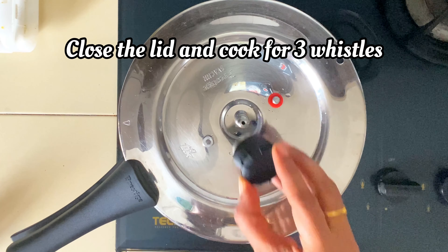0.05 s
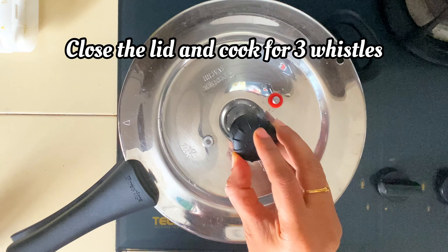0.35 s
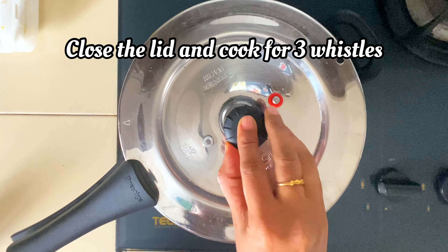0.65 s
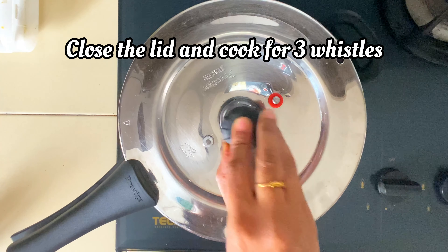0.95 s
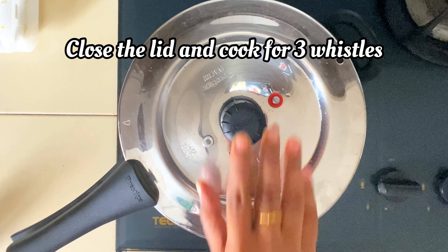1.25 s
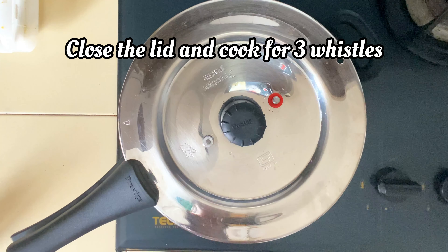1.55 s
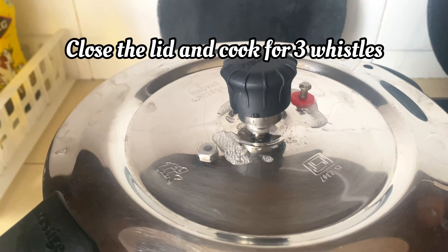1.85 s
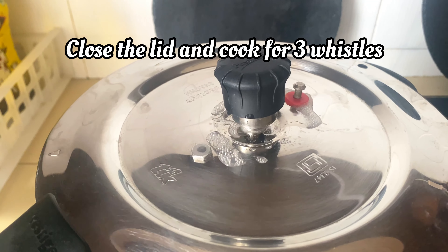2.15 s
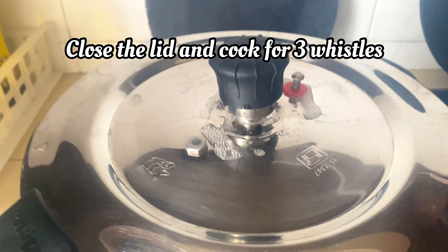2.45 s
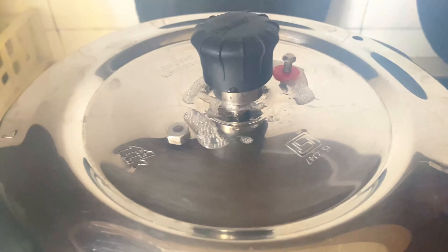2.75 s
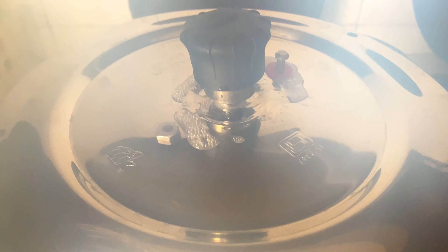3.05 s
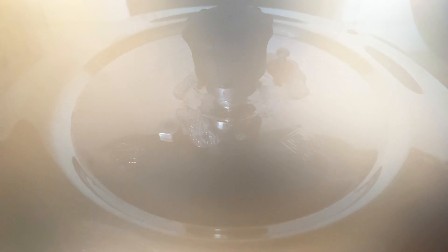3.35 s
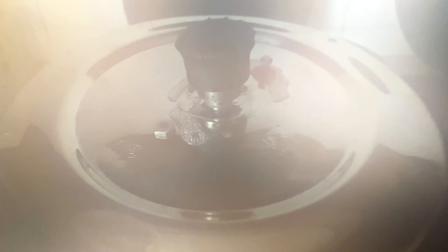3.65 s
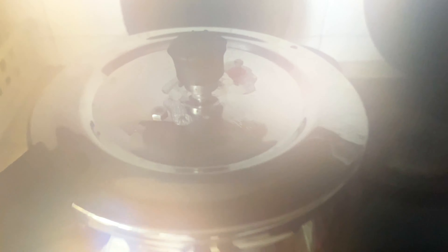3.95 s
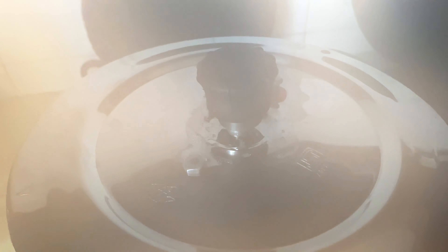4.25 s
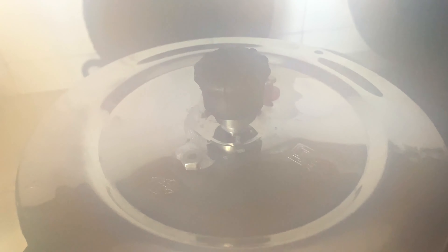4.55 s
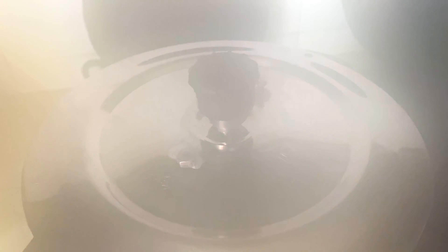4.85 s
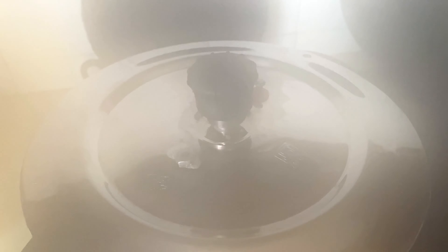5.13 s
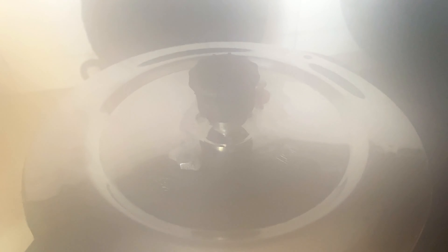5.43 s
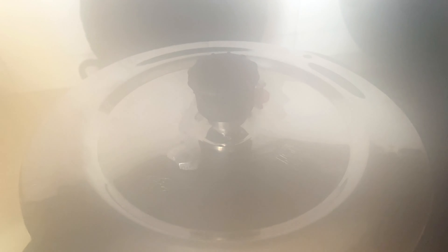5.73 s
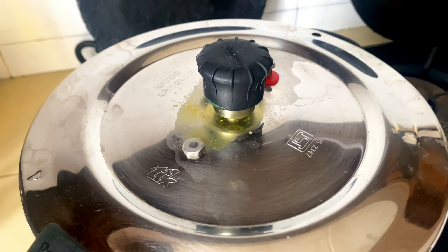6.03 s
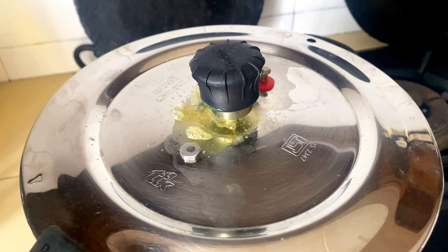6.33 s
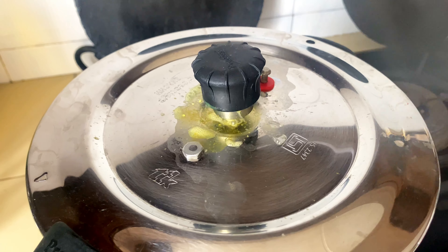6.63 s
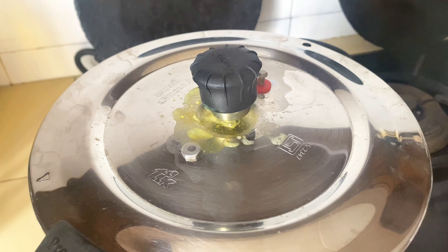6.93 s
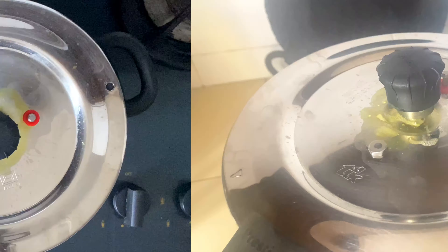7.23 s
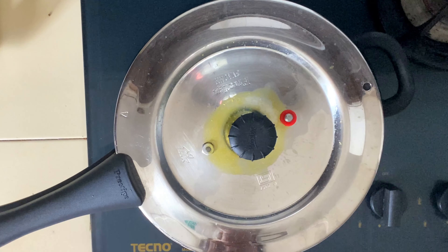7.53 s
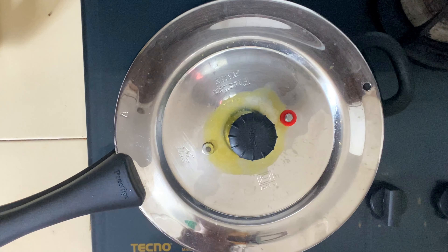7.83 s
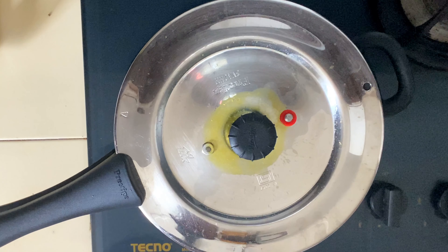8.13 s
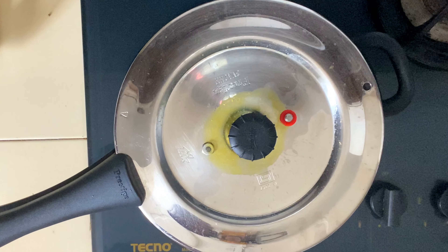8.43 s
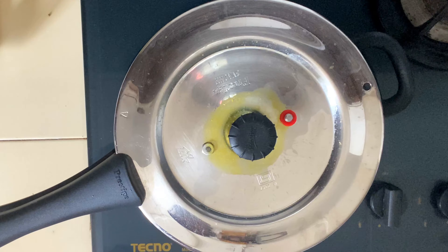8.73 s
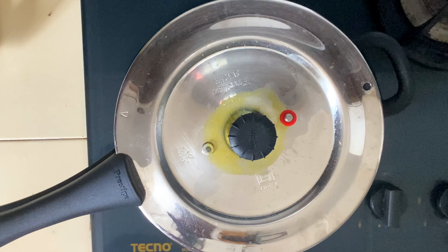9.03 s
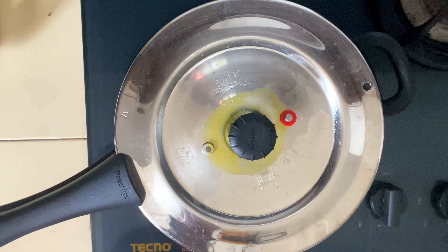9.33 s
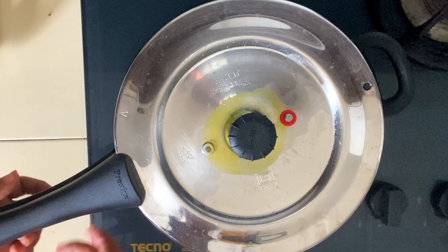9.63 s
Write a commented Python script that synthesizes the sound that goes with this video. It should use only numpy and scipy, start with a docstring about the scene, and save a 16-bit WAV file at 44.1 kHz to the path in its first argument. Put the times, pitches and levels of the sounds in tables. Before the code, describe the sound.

A gas flame rumbles quietly in a tiled kitchen, with the microphone close to a steel pressure cooker. From about 0.2 seconds the valve weight knocks against the vent and scrapes over it, then snaps home with a sharp metallic clack at 1 second. The lid rings briefly and the pot thuds softly. At 1.7 seconds steam bursts out in a loud, bright, steady hiss, with a small spit of water near 3.2 seconds. The hiss surges at 4.1 seconds and breaks off abruptly at 6 seconds. Almost at once it splutters up again with a wet roar, then fades out by 7.5 seconds as the low flame rumble comes back. After a faint tick, a metal utensil clatters and bounces nearby, slightly to the right, from about 8.5 to 9 seconds. Only the soft rumble of the burner remains.

```python
"""A tiled kitchen, a phone's two microphones close to a steel pressure cooker on a gas flame.
The weight valve is knocked against the vent, slid over it and snapped home. Steam blasts from under
the weight, right by the phone: it surges, breaks off, splutters up again and fades.
The flame is left rumbling, and a metal utensil clatters nearby, a little to the right."""
import sys
import numpy as np
from scipy import signal
from scipy.fft import rfft, irfft
from scipy.io import wavfile
from scipy.ndimage import uniform_filter1d

SR = 44100
rng = np.random.default_rng(int(sys.argv[2]) if len(sys.argv) > 2 else 0)


def materialize(psi):
    """Save the field psi as 16-bit PCM at rate SR to the path in sys.argv[1].

    A 1-D psi becomes a single channel; in a 2-D psi each row is a channel.
    """
    bounded = np.clip(np.atleast_2d(psi).T, -1, 1)
    quanta = np.round(bounded * 32767).astype(np.int16)
    wavfile.write(sys.argv[1], SR, quanta)


N = 431298
TIME = np.arange(N) / SR
FREQ = np.arange(N // 2 + 1) * SR / N

# the burner before the steam, and after it: frequency_hz, level_db
EARLY_FLAME_SPECTRUM = [(25, -17.5), (65, 5.5), (130, -5.5), (220, -15), (350, -19), (700, -21),
                        (1350, -32), (1660, -28.5), (1950, -36), (2500, -40.5), (2950, -39.5),
                        (3400, -42.5), (7000, -54), (15000, -71)]
LATE_FLAME_SPECTRUM = [(15, -55.5), (25, -33.5), (91, -0.5), (227, -21.5), (281, -14), (331, -26.5),
                       (399, -22.5), (482, -33.5), (552, -28.5), (848, -29.5), (1110, -35.5), (2700, -39),
                       (3340, -40.5), (10400, -43.5), (15500, -53)]
# the weight striking the vent: start_s, dull_db, bright_db, t60_s
WEIGHT_KNOCKS = [(.2405, -15.5, -44.5, 0.062), (.272, -34.5, -59, 0.26), (.319, -56, -55, 0.042),
                 (.481, -29, -38, 0.092), (.735, -54, -72.5, 0.081), (.754, -48, -71.5, 0.11),
                 (.964, -23.5, -42, 0.15), (.974, -18, -22, 0.076), (.9815, -6.5, -17.5, 0.091),
                 (.989, -15, -17.5, 0.077), (.996, -7.5, -16.5, 0.067), (1.006, -5.5, -9, 0.032),
                 (1.0105, -14, -11.5, 0.051), (1.051, -40, -52, 0.027)]
# the weight sliding, then fingers leaving it: start_s, length_s, dull_db, bright_db, release_t60_s
WEIGHT_RUBS = [(.364, 0.12, -26.5, -31, .06), (1.19, 0.034, -38, -47, 0.18), (1.24, 0.029, -42, -51, .06)]
# a dull contact, and a sharp one: frequency_hz, level_db
DULL_SPECTRUM = [(40, -24), (170, -5.5), (280, -6.5), (400, -3.5), (620, 4), (1150, 0), (1650, -6),
                 (2300, -17.5), (3300, -19), (5000, -33), (9000, -57.5)]
BRIGHT_SPECTRUM = [(300, -24), (1500, -4.5), (3300, 1.5), (4500, -0.5), (5500, -2), (6100, -6.5), (6900, 6),
                   (7700, -3.5), (8500, 2.5), (10300, -12), (12000, -5), (15500, -20.5)]
# resonances of the hollow weight: centre_hz, width_hz, lift_db
WEIGHT_HOLLOW = [(553, 57, 5.5), (850, 150, 7.5), (1140, 150, 3.5), (1570, 120, 7), (2240, 220, 11.5),
                 (3370, 300, 3.5), (5580, 200, 8), (6900, 260, 8), (8500, 270, 6)]
# ringing of the steel lid: pitch_hz, level_db, t60_s
LID_MODES = [(545, -1, 0.12), (630, -4.5, 0.2), (670, -8.5, 0.22), (845, -8, 0.16), (880, -6.5, 0.2),
             (1020, -12, .35), (1167, -9.5, .4), (1480, 5, .15), (1687, -8.5, 0.97), (2380, 7, 0.17),
             (3160, -1.5, 0.35), (3370, 0.5, 0.39), (4150, -4.5, .4), (5430, 4.5, 0.44), (6500, -1.5, .3),
             (6729, -8, .4), (6930, -2, .3), (8156, -6, .25), (8420, -6.5, 0.3), (11360, -1, .25)]
# pushes that rock the full pot on its stand: start_s, level_db
POT_PUSHES = [(.243, -32), (0.404, -40), (.494, -30.5), (0.986, -27.5), (1.002, -21)]
# low ringing of the pot: pitch_hz, level_db, t60_s
POT_MODES = [(82, -9, .25), (119, -3, 0.17), (182, 1, .11), (450, -8, .08), (600, -9, .1)]
# blasts of steam: start_s, rise_s, end_s, fall_s, level_db, surge_db, surge_s, sag_db_per_s,
# water_roar_db, hiss_depth_db, buffet_db, seep_before_s
STEAM_BLASTS = [(1.689, .033, 4.131, 0.02, -27.5, 0.45, 0.28, .5, 3.5, 3.5, -80, 0),
                (4.111, 0.029, 6.009, 0.004, -26, 4, 0.31, 0.26, 2, 0.6, -66.5, 0),
                (6.118, .17, 7.465, .35, -22, 3, 0.21, 5.5, 14.5, 1.3, -64, 0.104)]
# the jet's hiss in each blast: frequency_hz, first_db, second_db, third_db
HISS_SPECTRA = [(910, -49, -42, -42), (1556, -18, -22.5, -21.5), (2340, -10, -10.5, -14),
                (3090, -2, -4.5, -6), (4190, 1.5, -1.5, -1.5), (4670, 3, 0, 0.5), (5180, -0.5, -1.5, 2.5),
                (6200, -2, 1, -4), (7280, -0.5, 1, 0), (8140, -1.5, -6.5, -4), (9240, -14, -18.5, -14),
                (10400, -16, -17, -16.5), (11420, -12.5, -12, -12), (13600, -3.5, -11, -11.5),
                (16000, -14, -12.5, -17.5)]
# the jet's lower roar: frequency_hz, level_db
ROAR_SPECTRUM = [(30, -24), (110, -16), (200, -21), (420, -8), (800, -5), (1400, -1.5), (2000, -0.5),
                 (3200, -9), (6000, -25.5)]
# resonances of the gap between weight and lid: centre_hz, width_hz, lift_db
GAP_RESONANCES = [(847, 31, 5.5), (1404, 28, 6.5), (2570, 46, 7), (3092, 68, 5.5), (3195, 50, 6.5),
                  (3420, 31, 9), (3576, 44, 5.5), (3835, 46, 3.5), (4220, 59, 6), (6700, 170, 1.5)]
# the jet at the two microphones: frequency_hz, left_lead_rad, left_minus_right_db, coherence
JET_AT_MICS = [(100, 0, 2, .5), (700, .3, 2, .68), (2200, 2.5, 2.5, .76), (3400, 2.45, 4, .8),
               (4300, 2.6, 1, .78), (5200, 3.15, -1, .84), (6300, 4.3, 0, .8), (7400, 5.6, -3, .76),
               (8300, 4.4, -1, .7), (9300, 3.1, 0, .99), (10600, 0, 0, .95), (11700, -.2, 0, .92),
               (13400, -3.1, 0, .99), (15200, -6.3, 0, .95)]
# the jet off the lid, the pan behind and the tiles: delay_s, level_db
NEAR_REFLECTIONS = [(.0011, -21.5), (.0018, -25), (.0039, -14.5), (.0052, -14.5), (.0083, -13.5)]
# steam buffeting the microphones: frequency_hz, level_db
BUFFET_SPECTRUM = [(20, -14), (45, -2.5), (90, 1), (170, -7.5), (300, -7), (700, -34), (3000, -70)]
# water spat through the vent: centre_s, half_length_s, from_hz, to_hz, level_db
WATER_SPURTS = [(3.24, 0.027, 4470, 4900, -36), (6.252, .028, 450, 900, -33),
                (6.288, 0.031, 3000, 4673, -30.5)]
# the utensil landing and bouncing: start_s, dull_db, bright_db, t60_s
UTENSIL_TAPS = [(8.166, -80.5, -57, 0.021), (8.5648, -62, -29, 0.034), (8.569, -42, -25, 0.031),
                (8.624, -70, -47, .04), (8.66, -60, -36, 0.033), (8.666, -40.5, -47, 0.12),
                (8.7245, -60, -33, 0.089), (8.745, -59, -40.5, 0.13), (8.762, -62, -45, 0.17),
                (8.795, -70, -42.5, 0.071), (8.921, -68, -42, 0.077), (9.025, -70, -49, 0.066)]
# its sharp contacts: frequency_hz, level_db
UTENSIL_SPECTRUM = [(700, -37.5), (1150, -10), (1650, 6), (2600, -2.5), (3200, -7), (5000, -9),
                    (7100, -11.5), (8500, -15), (12000, -15.5), (15500, -34)]
# its broad resonances: centre_hz, width_hz, lift_db
UTENSIL_RESONANCES = [(1740, 420, 1), (3150, 350, 3), (4400, 330, 7.5), (5660, 370, 10), (7140, 520, 9.5),
                      (8200, 300, 7)]
# its ringing: pitch_hz, level_db, t60_s
UTENSIL_RING = [(1360, -2.5, 0.26), (1703, -3.5, 0.15), (2030, -3, 0.2), (2250, -7, .22), (2610, -1.5, .17),
                (3090, -4.5, 0.14), (3270, -2, 0.24), (3890, -3, 0.2), (5780, -9, .2), (6900, -11, .26),
                (8403, -10, .3)]


def undb(db):
    """Decibels to gain."""
    return 10 ** (np.asarray(db) / 20)


def unit(x):
    """Scale to an rms of 1."""
    return x / np.sqrt(np.mean(x ** 2))


def ramp(elapsed, length):
    """Rise from 0 to 1 over a length of time."""
    return np.clip(elapsed / length, 0, 1)


def hold(age, length):
    """Stay near 1 for a length of time, then drop smoothly to 0."""
    return np.exp(-(age / length) ** 4)


def walk(rate_hz):
    """Glide between random levels, at an rms of 1."""
    step = max(int(SR / rate_hz), 1)
    levels = np.repeat(rng.standard_normal(N // step + 1), step)
    return unit(uniform_filter1d(levels, step)[:N])


def lowpass(x, corner_hz, steepness):
    """The part below a corner frequency, with no phase shift."""
    return irfft(rfft(x) / (1 + (FREQ / corner_hz) ** steepness), N)


def resonances(peaks):
    """Lift in dB of a set of resonances, at every frequency."""
    return sum(db / (1 + (2 * (FREQ - hz) / width) ** 2) for hz, width, db in peaks)


def colour(x, spectrum, lift_db=0):
    """Filter by a spectrum scaled to unit power; causal, so that attacks stay sharp."""
    hz, db = np.transpose(spectrum)
    gain = unit(undb(np.interp(np.log(FREQ + 1), np.log(hz), db) + lift_db))
    cepstrum = irfft(np.log(gain), N)
    cepstrum[1:N // 2] *= 2
    cepstrum[N // 2 + 1:] = 0
    return irfft(rfft(x) * np.exp(rfft(cepstrum)), N)


def mic_noise(coherence, lead_rad=0, pan_db=0):
    """White noise at the two microphones; positive lead and pan favour the left."""
    mid, side = rfft(rng.standard_normal((2, N)))
    sign = np.array([[1], [-1]])
    mics = np.sqrt((1 + coherence) / 2) * mid + sign * np.sqrt((1 - coherence) / 2) * side
    return irfft(mics * undb(sign * pan_db / 2) * np.exp(.5j * sign * lead_rad), N)


def flame(spectrum, hiss_coherence, rumble_coherence, flicker_db):
    """The gas flame rumbles nearly alike at both microphones, under a faint diffuse hiss."""
    coherence = hiss_coherence + (rumble_coherence - hiss_coherence) / (1 + (FREQ / 600) ** 4)
    burner = colour(mic_noise(coherence, pan_db=-.3), spectrum)
    rumble = lowpass(burner, 300, steepness=4)
    return burner + rumble * (undb(flicker_db * walk(12)) - 1)


def contacts(blows):
    """Dull and bright force envelopes: each blow starts suddenly and dies quickly."""
    power = np.zeros((2, N))
    for start_s, dull_db, bright_db, t60 in blows:
        start = int(start_s * SR)
        fade = undb(-60 * TIME[:min(SR // 2, N - start)] / t60)
        power[:, start:start + len(fade)] += (undb([[dull_db], [bright_db]]) * fade) ** 2
    return np.sqrt(power)


def ring(x, modes, ring_db, split, count=5):
    """Add the ringing of a metal body: each mode is a beating cluster of close partials."""
    t = TIME[:SR // 2]
    response = 0
    for hz, db, t60 in modes:
        partials_hz = hz * (1 + split * rng.uniform(-1, 1, (count, 1)))
        phases = rng.uniform(0, 2 * np.pi, (2, count, 1))  # each microphone hears its own mix
        cluster = np.sin(2 * np.pi * partials_hz * t + phases).sum(1)
        response += undb(db - 60 * t / t60) * cluster
    return x + undb(ring_db) * signal.fftconvolve(x, unit(response) / np.sqrt(len(t)), axes=1)[:, :N]


def kitchen(x, wet_db, t60, treble_t60):
    """Add the diffuse echo of tiled walls; the treble dies sooner."""
    t = TIME[:SR]
    noise = rng.standard_normal((2, SR))
    low = signal.sosfilt(signal.butter(2, 4000, fs=SR, output="sos"), noise)
    tail = low * undb(-60 * t / t60) + (noise - low) * undb(-60 * t / treble_t60)
    tail *= ramp(t, .008)
    return x + undb(wet_db) * signal.fftconvolve(x, unit(tail) / np.sqrt(SR), axes=1)[:, :N]


def weight_on_vent(force, hollowness, ring_db):
    """Metal chatters on metal, coloured by the hollow weight, and the lid rings with it."""
    dull, bright = force
    lift_db = hollowness * resonances(WEIGHT_HOLLOW)
    sharp = colour(bright * mic_noise(.46, lead_rad=1, pan_db=.93), BRIGHT_SPECTRUM, lift_db)
    blunt = colour(dull * mic_noise(.61, lead_rad=.15, pan_db=.95), DULL_SPECTRUM, lift_db)
    # only hard contacts are short enough to reach the top of the treble
    edge = sharp - lowpass(sharp, 6400, steepness=20)
    hardness = np.sqrt(np.clip(bright / undb(-18.5), .2, 1.5))
    chatter = blunt + sharp + edge * (hardness - 1)
    return ring(chatter * undb(-2), LID_MODES, ring_db, split=.018)


def weight_valve():
    """Close up, pressing fingers damp the weight's knocks; its light slide rings more freely."""
    stick_slip = unit(undb(2 * walk(450)))
    knocks = weight_on_vent(contacts(WEIGHT_KNOCKS), hollowness=.79, ring_db=-18)
    scrape = weight_on_vent(rubs() * stick_slip, hollowness=.85, ring_db=-13)
    return kitchen(knocks + scrape, wet_db=-16.5, t60=.72, treble_t60=.58)


def pot():
    """Each push on the lid sets the heavy pot thudding on the stove, dead centre."""
    t = TIME[:SR // 2]
    thud = sum(undb(db - 60 * t / t60) * np.sin(2 * np.pi * hz * t) for hz, db, t60 in POT_MODES)
    out = np.zeros(N)
    for start_s, db in POT_PUSHES:
        start = int(start_s * SR)
        out[start:start + len(t)] += undb(db) * thud
    return out


def rubs(bite_db=52.5):
    """Dull and bright force envelopes: each rub swells, brightens as the edge bites and lets go."""
    force = np.zeros((2, N))
    for start_s, length_s, dull_db, bright_db, t60 in WEIGHT_RUBS:
        progress = ramp(TIME - start_s, length_s)
        release_db = -60 * np.maximum(TIME - start_s - length_s, 0) / t60
        edge_db = bright_db - bite_db * (1 - progress)
        force += progress ** .8 * undb([dull_db + release_db, edge_db + release_db])
    return force


def jet(spectrum, sway):
    """Jet noise rings the gap; near surfaces comb it, wavering as the hand holding the phone sways."""
    hz, *columns = np.transpose(JET_AT_MICS)
    lead_rad, pan_db, coherence = (np.interp(FREQ, hz, column) for column in columns)
    direct = colour(mic_noise(coherence, lead_rad, pan_db), spectrum, resonances(GAP_RESONANCES))
    out = direct.copy()
    for delay_s, db in NEAR_REFLECTIONS:
        delayed_time = TIME - delay_s * (1 + sway * walk(1.5))
        out += undb(db) * np.array([np.interp(delayed_time, TIME, mic) for mic in direct])
    return out / np.std(out.mean(0))


def steam(blast, hiss_column, sway, seep_db=-41.5, roar_db=-23.5, water_clear_s=.2):
    """The weight lifts; the jet surges, sags with the pressure and buffets the microphones."""
    (start_s, rise_s, end_s, fall_s, level_db, surge_db, surge_s, sag_db_per_s,
     water_db, depth_db, buffet_db, seep_s) = blast
    age = np.clip(TIME - start_s, 0, end_s - start_s)
    still_open = ramp(end_s - TIME, fall_s)
    seep = undb(seep_db) * (TIME > start_s - seep_s)  # escapes under the seated weight
    flow = np.maximum(ramp(age, rise_s) ** 2.23, seep) * still_open ** 1.13
    flutter_db = .6 * walk(35) + .3 * walk(3.8)
    pressure_db = surge_db * hold(age, surge_s) - sag_db_per_s * age + flutter_db
    hiss = jet(np.array(HISS_SPECTRA)[:, [0, hiss_column]], sway)
    roar = jet(ROAR_SPECTRUM, sway)
    # the hiss thins through the blast, then deepens as the gap closes
    body_db = depth_db * (1 - 2 * age / (end_s - start_s)) + 4 * (1 - still_open) + .68 * walk(20)
    hiss += lowpass(hiss, 5500, steepness=10) * (undb(body_db) - 1)
    hiss *= undb(.5 * walk(400))
    # the roar is louder until the water has cleared
    roar *= undb(roar_db + water_db * hold(age, water_clear_s) + .59 * walk(120))
    buffet = colour(mic_noise(.51), BUFFET_SPECTRUM) * undb(buffet_db + 1.4 * pressure_db)
    return (hiss + roar) * flow * undb(level_db + pressure_db) + buffet * np.sqrt(flow)


def spurts(churn_hz=440, glide_s=.014):
    """Each slug of water churns in a narrow band that climbs as it clears the vent."""
    out = np.zeros((2, N))
    for centre_s, half_s, from_hz, to_hz, db in WATER_SPURTS:
        cleared = (1 + np.tanh((TIME - centre_s) / (2 * glide_s))) / 2
        phase = 2 * np.pi * np.cumsum(from_hz * (to_hz / from_hz) ** cleared) / SR
        shared, *each_mic = (walk(churn_hz) * np.cos(phase) + walk(churn_hz) * np.sin(phase)
                             for _ in range(3))
        churn = (shared + .5 * np.array(each_mic)) * undb([[1], [-1]])
        swell = np.exp(-((TIME - centre_s) / half_s) ** 2 / 2)
        out += unit(churn) * undb(db) * swell
    return out


def utensil():
    """A metal utensil is put down and bounces nearby, a little to the right, with more room on it."""
    dull, bright = contacts(UTENSIL_TAPS)
    blunt = colour(dull * mic_noise(.34), DULL_SPECTRUM)
    chatter = bright * mic_noise(.78, lead_rad=.73, pan_db=-2.2)
    sharp = colour(chatter, UTENSIL_SPECTRUM, resonances(UTENSIL_RESONANCES))
    clatter = ring(blunt + sharp, UTENSIL_RING, ring_db=-9.5, split=.0088)
    return kitchen(clatter, wet_db=-6.5, t60=.46, treble_t60=.26)


def scene():
    """At the stove: burner, valve and pot, three blasts of steam with spat water, then the utensil."""
    early = flame(EARLY_FLAME_SPECTRUM, hiss_coherence=.35, rumble_coherence=.87, flicker_db=3)
    late = flame(LATE_FLAME_SPECTRUM, hiss_coherence=.24, rumble_coherence=1, flicker_db=.9)
    burner = early * undb(-44.5) * ramp(1.716 - TIME, .021)  # drops out as the steam starts
    burner += late * undb(-45) * ramp(TIME - 7.11, .37)  # swells back as it fades
    first, second, third = STEAM_BLASTS
    blasts = steam(first, hiss_column=1, sway=.0322)
    blasts += steam(second, hiss_column=2, sway=.0043)
    blasts += steam(third, hiss_column=3, sway=.016)
    return burner + weight_valve() + pot() + blasts + spurts() + utensil()


def record(dry):
    """The phone clips the peaks at full scale and cuts the top above 15.8 kHz."""
    top_cut = signal.ellip(10, .2, 75, 15800, fs=SR, output="sos")
    return signal.sosfilt(top_cut, np.clip(dry, -1, 1))


dry = scene()
out = record(dry)
materialize(out)
```